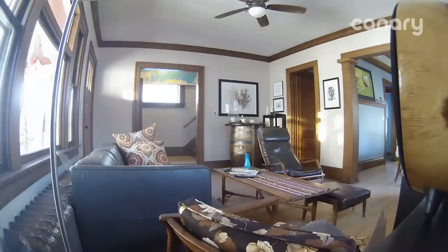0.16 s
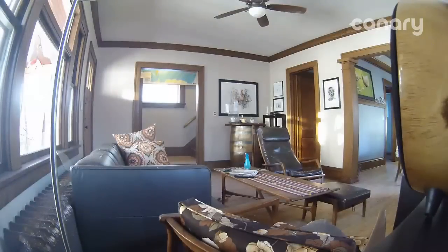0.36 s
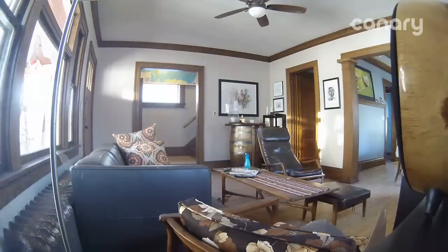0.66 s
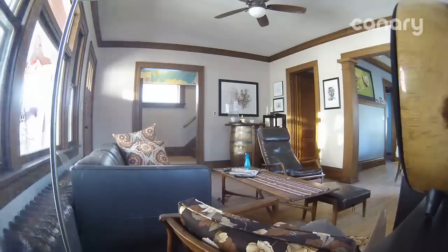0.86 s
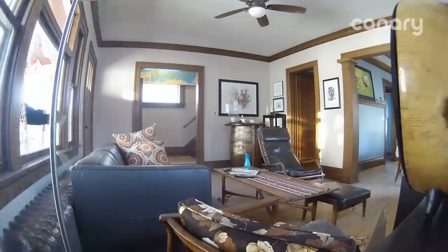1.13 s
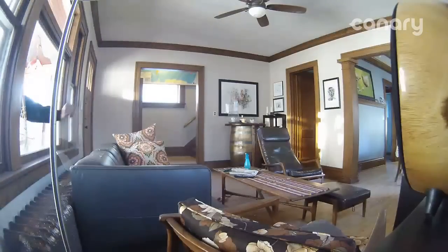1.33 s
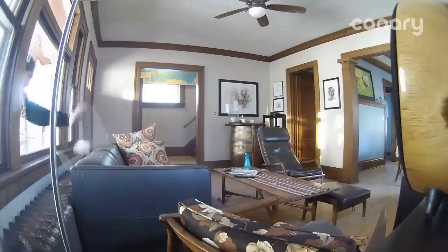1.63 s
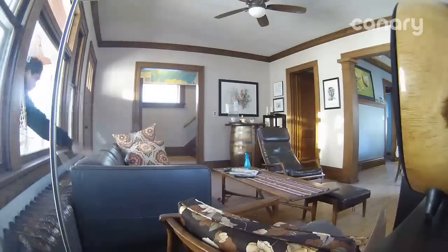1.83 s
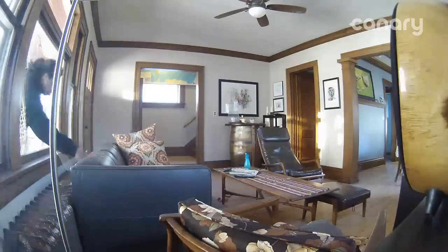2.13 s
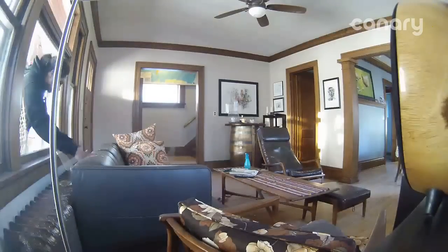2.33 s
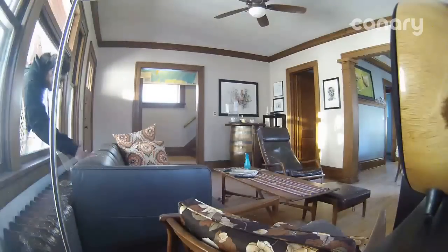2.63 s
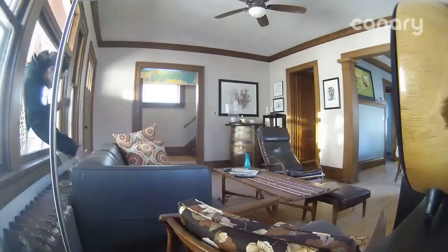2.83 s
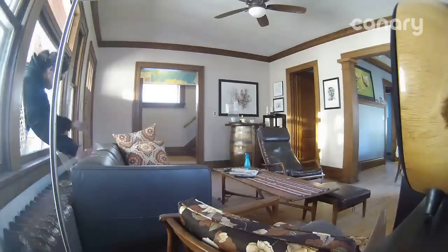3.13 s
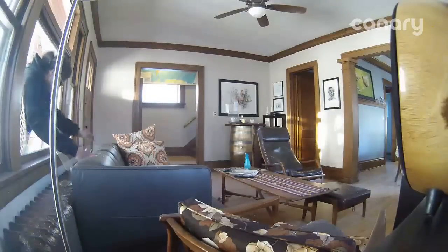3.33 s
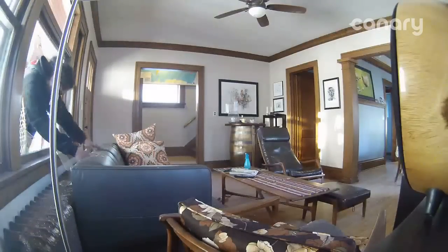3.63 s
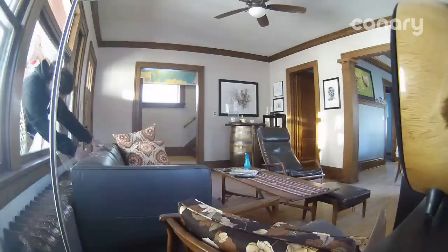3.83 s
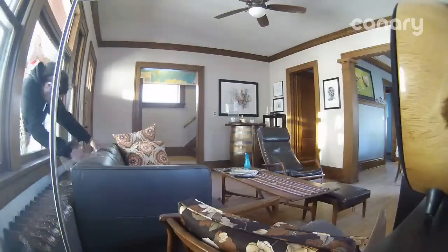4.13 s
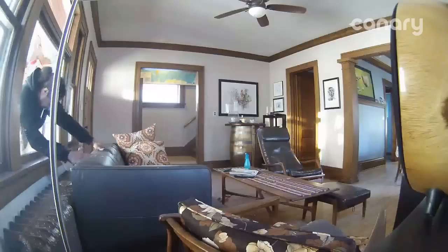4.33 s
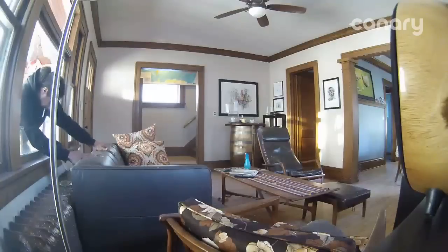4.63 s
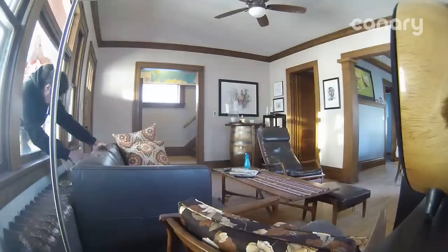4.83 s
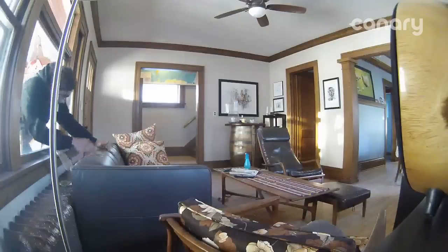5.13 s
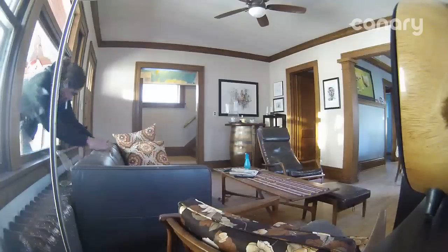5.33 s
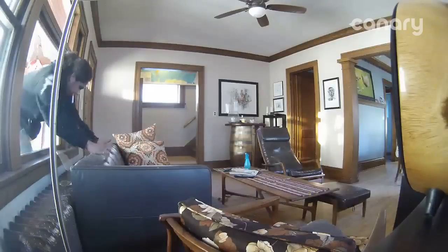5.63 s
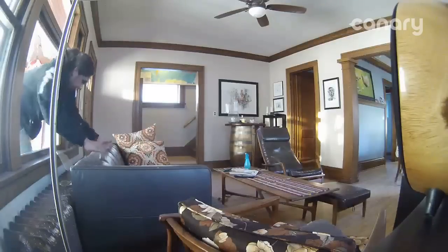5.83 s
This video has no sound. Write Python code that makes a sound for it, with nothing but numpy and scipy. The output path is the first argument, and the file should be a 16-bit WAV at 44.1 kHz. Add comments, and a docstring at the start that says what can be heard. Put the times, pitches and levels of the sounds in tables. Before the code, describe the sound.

In a quiet furnished living room, faint boom and hiss give way to a hard crack at about one second. After a short dropout, repeated blows break more glass; grit crunches and slides, splinters tinkle and big shards ring and clatter. Wooden frame knocks and soft thuds continue to the end. A small indoor microphone hisses and clips on the hardest hits.

```python
"""Glass grit slides and crunches as a window is broken into in a quiet living room, over frame boom and rumble.
Blows crack on pane and frame, soft thuds bump, splinters tinkle, four large shards ring as they knock about.
Grit, scrape, boom and rumble are patchy or plain shaped noise; cracks are noise bursts; knocks, thuds,
splinters and shards are damped sines. A decaying noise tail answers as the room. The small microphone
hisses, clips on the hardest blows and drops out twice."""
import sys
import numpy as np
from scipy import signal
from scipy.fft import rfft, irfft, next_fast_len
from scipy.io import wavfile
from scipy.ndimage import uniform_filter1d, map_coordinates

SR = 44100
rng = np.random.default_rng(int(sys.argv[2]) if len(sys.argv) > 2 else 0)


def persist_wave(psi):
    """Save psi, clipped to +-1, as 16-bit WAV."""
    counts = np.round(np.clip(psi, -1, 1) * 32767).astype(np.int16)
    wavfile.write(sys.argv[1], SR, np.atleast_2d(counts).T)


N = 263277


def amp(db):
    """dB to gain."""
    return 10 ** (np.asarray(db) / 20)


def unit(x):
    """Scaled to rms 1."""
    return x / np.sqrt(np.mean(x ** 2) + 1e-20)


def along(points, hz):
    """Value at hz from (Hz, value) points, linear over log frequency."""
    point_hz, value = np.transpose(points)
    return np.interp(np.log(hz + 1), np.log(point_hz + 1), value)


def filtered(x, response):
    """x with its spectrum multiplied by response(hz)."""
    m = next_fast_len(len(x) + 8192)
    return irfft(rfft(x, m) * response(np.fft.rfftfreq(m, 1 / SR)), m)[:len(x)]


def coloured(x, spectrum):
    """x shaped by a spectrum of (Hz, dB) points, at rms 1."""
    return unit(filtered(x, lambda hz: amp(along(spectrum, hz))))


def add(track, start_s, sound):
    """Mixes a sound into the track at start_s."""
    part = track[round(start_s * SR):][:len(sound)]
    part += sound[:len(part)]


def wobble(knots_per_s):
    """Random curve, straight between normally distributed knots."""
    knots = rng.standard_normal(int(N * knots_per_s / SR) + 4)
    return map_coordinates(knots, [np.arange(N) * knots_per_s / SR], order=1)


def patchy(depth_db, window=1024):
    """Noise whose gain varies at random in small time-frequency patches."""
    z = signal.stft(rng.standard_normal(N), nperseg=window)[2]
    field = uniform_filter1d(rng.standard_normal(z.shape), size=2, axis=0)
    field = uniform_filter1d(field, size=4, axis=1)
    return unit(signal.istft(z * amp(depth_db * unit(field)), nperseg=window)[1][:N])


def motion_levels():
    """Grit, scrape and frame in dB: each row ramps them from where they are to new peaks, then they fall."""
    # Each row: start in seconds, rise in seconds, then peak grit, scrape and frame level in dB.
    ramps = [(-.25, .35, -38.5, -44, -34.5), (.25, 0.11, -60, -63, -55.5), (.62, 0.15, -67, -74, -58.5),
             (.722, 0.0075, -54.5, -67, -63), (.765, 0.0069, -47, -64, -53.5),
             (.775, 0.055, -45.5, -53, -47), (0.899, 0.16, -31.5, -52.5, -58),
             (1.036, 0.014, -27.5, -37.5, -37), (1.07, 0.19, -34, -44, -41.5),
             (1.5, 0.06, -52.5, -57.5, -53), (1.59, 0.11, -53.5, -55, -47), (1.72, 0.08, -56, -61.5, -54),
             (1.87, 0.017, -47.5, -56.5, -49.5), (2.007, 0.017, -39.5, -49.5, -55),
             (2.14, 0.083, -59, -63.5, -50), (2.263, 0.0082, -30, -36.5, -37.5),
             (2.366, 0.017, -24, -46, -55.5), (2.44, 0.17, -36, -42.5, -55), (2.554, 0.0076, -29, -34, -41),
             (2.67, .095, -46, -53, -44.5), (2.766, 0.025, -19.5, -32.5, -47.5),
             (2.798, 0.11, -29, -40.5, -39), (2.978, 0.17, -35, -36.5, -36.5),
             (3.1, .09, -39.5, -45.5, -44.5), (3.288, 0.032, -33, -40, -37.5),
             (3.501, .085, -46.5, -46, -37), (3.588, .022, -50.5, -53.5, -65.5),
             (3.615, 0.24, -31, -51.5, -60.5), (3.792, 0.005, -27.5, -41, -51.5),
             (3.81, 0.12, -34.5, -42.5, -44), (3.972, 0.016, -27, -34, -40.5),
             (3.999, 0.066, -34, -38, -39), (4.298, 0.039, -42.5, -52.5, -48.5),
             (4.349, .07, -39, -45, -40), (4.43, .07, -34, -40.5, -37), (4.576, 0.011, -31, -37, -48.5),
             (4.599, 0.08, -29.5, -36, -40.5), (5.05, 0.08, -64.5, -72, -61.5),
             (5.36, 0.0077, -50, -49.5, -29), (5.38, 0.042, -58, -58, -41.5),
             (5.426, 0.017, -32, -40.5, -33), (5.46, 0.063, -37.5, -42.5, -41),
             (5.6, 0.0051, -34, -29, -36), (5.78, 0.063, -44.5, -41, -50), (5.848, .115, -47.5, -47, -35)]
    # Fall of grit, scrape and frame in dB per second.
    fall_db_per_s = [103, 94.5, 100.5]
    # Lowest level that the fall of grit, scrape and frame reaches in dB.
    floor_db = [-69, -73, -66.5]
    t = np.arange(0, N / SR, .001)
    fall = np.array(fall_db_per_s)[:, None]
    lowest = np.array(floor_db)[:, None]
    level = lowest + 0 * t
    for start_s, rise_s, *peak_db in ramps:
        since = t - start_s
        peak = np.array(peak_db)[:, None]
        before = level[:, [np.argmax(since >= 0)]]
        rising = before + (peak - before) * since / rise_s
        falling = peak - fall * (since - rise_s)
        after = np.where(since < rise_s, rising, falling)
        level = np.where(since >= 0, np.maximum(after, lowest), level)
    return [np.interp(np.arange(N) / SR, t, row) for row in level]


def motion():
    """Sliding glass: patchy hiss with splinters, and scrape, over the frame's boom, each on its level curve."""
    # Grit spectrum. Each row: frequency in Hz, relative level in dB.
    grit_spectrum = [(1350, -62.5), (2300, -4), (2750, -12.5), (3000, 0), (3380, -3.5), (3570, 1.5),
                     (4730, 3.5), (5080, -1.5), (6200, -11), (8590, -32.5), (8940, -34), (9590, -36.5),
                     (13200, -49), (15000, -89.5)]
    # Scrape spectrum. Each row: frequency in Hz, relative level in dB.
    scrape_spectrum = [(380, -39.5), (650, -8), (737, -6), (1200, 0), (1480, -7), (2230, -5), (2700, -7.5),
                       (3510, -34), (5940, -120)]
    # Wooden frame's spectrum. Each row: frequency in Hz, relative level in dB.
    frame_spectrum = [(120, -37.5), (200, -11), (265, -9.5), (404, -5), (456, -0.5), (529, -5), (668, -23),
                      (750, -18), (980, -46.5), (1650, -120)]
    grit_db, scrape_db, frame_db = motion_levels()
    splinter_db = -6  # over the hiss
    glass = patchy(4.1) + amp(splinter_db) * splinters(count=1300, cycles=600, spread_db=18.5)
    grit = amp(grit_db) * coloured(glass, grit_spectrum)
    scrape = amp(scrape_db) * coloured(patchy(3.74), scrape_spectrum)
    boom = amp(frame_db) * coloured(patchy(2.45), frame_spectrum)
    return grit + scrape + boom


def rumble():
    """Floor and sofa: low noise on a drawn level curve with a small random wander."""
    # Level curve before the wander. Each row: time in seconds, level in dB.
    rumble_level = [(0, -54.5), (.26, -66), (.53, -69), (.82, -59), (.98, -64), (1.04, -47), (1.599, -57.5),
                    (1.92, -58.5), (2.3, -53), (2.44, -62.5), (2.89, -50.5), (3.28, -61), (3.34, -50.5),
                    (3.58, -63.5), (3.68, -82.5), (3.95, -53.5), (4.75, -51.5), (5.26, -81), (5.37, -59),
                    (5.84, -54), (5.97, -46)]
    # Rumble spectrum. Each row: frequency in Hz, relative level in dB.
    bass_spectrum = [(12, -39.5), (20, -2.5), (92, 1.5), (145, 0), (230, -4), (300, -28), (510, -120)]
    wander_db = 2
    level_db = np.interp(np.arange(N) / SR, *np.transpose(rumble_level)) + wander_db * wobble(10)
    return amp(level_db) * coloured(rng.standard_normal(N), bass_spectrum)


def blows():
    """Each sharp blow is a decaying noise burst of cracking glass and a damped 450 Hz knock in the frame."""
    # Each row: start in seconds, crack level in dB before trim, frame knock level in dB, crack t60 in seconds.
    sharp_blows = [(0.7337, -41, -56, 0.047), (1.041, 4.5, -15, 0.02), (1.05, -25, -34, 0.045),
                   (1.641, -33, -62, 0.022), (1.8786, -42, -39, 0.018), (2.032, -28.5, -57, 0.038),
                   (2.2713, -16.5, -58, 0.051), (2.3801, -0.5, -39.5, 0.013), (2.3904, -19, -55.5, 0.04),
                   (2.5605, -10, -33.5, 0.023), (2.783, -17.5, -35, 0.073), (2.8395, 0, -16, 0.02),
                   (2.8613, -19, -25.5, 0.021), (3.2944, -29, -48.5, 0.011), (3.3176, -12.5, -36, 0.024),
                   (3.5933, 1, -46.5, 0.0098), (3.7974, -26, -36, 0.043), (3.9755, -18.5, -27, 0.025),
                   (4.4375, -21.5, -37, 0.055), (4.584, -24, -23.5, 0.06), (5.4277, -11, -13.5, 0.034),
                   (5.435, -15, -21, 0.028), (5.6073, -24, -24.5, 0.084)]
    # Cracking glass spectrum. Each row: frequency in Hz, relative level in dB.
    crack_spectrum = [(410, -44.5), (700, -12), (1300, -26.5), (2240, -8.5), (2760, -13), (4630, 10),
                      (5510, -8), (6550, -8), (7260, -24.5), (9250, -26.5), (11000, -40.5), (14300, -57),
                      (22000, -120)]
    trim_db, knock_hz, knock_t60_s = -4, 450, 0.049
    out, t = np.zeros(N), np.arange(SR // 6) / SR
    for start_s, crack_db, knock_db, t60_s in sharp_blows:
        burst = coloured(rng.standard_normal(len(t)), crack_spectrum)
        crack = burst * amp(crack_db + trim_db - 60 * t / t60_s) * (1 - np.exp(-t / .0004))
        knock = np.sin(2 * np.pi * knock_hz * t) * amp(knock_db - 60 * t / knock_t60_s)
        add(out, start_s, crack + knock * (1 - np.exp(-t / 0.0023)))
    return out


def room(x):
    """Room answer to x: a noise tail in which each frequency dies at its own speed."""
    # Each row: frequency in Hz, t60 in seconds.
    room_t60 = [(200, 0.49), (2000, 0.21), (8000, 0.13)]
    hz, t, z = signal.stft(rng.standard_normal(SR // 2), SR, nperseg=256)
    decay = amp(-60 * t / along(room_t60, hz)[:, None])
    tail = signal.istft(z * decay, SR, nperseg=256)[1]
    delayed = np.pad(x, (300, 0))  # samples
    return signal.fftconvolve(delayed, tail / np.linalg.norm(tail))[:N]


def thuds():
    """Soft bumps, each one damped sine with a gentle onset."""
    # Each row: start in seconds, level in dB, pitch in Hz, t60 in seconds.
    bumps = [(2.162, -29, 241, 0.059), (3.119, -22, 402, 0.044), (3.334, -20, 128, 0.053),
             (3.544, -12, 435, 0.028), (4.187, -26, 75.4, 0.12), (4.239, -21.5, 66.6, 0.041),
             (4.406, -24, 449, 0.046), (5.365, -25, 450, 0.13), (5.58, -13, 438, 0.038),
             (5.913, -28.5, 210, 0.15)]
    out, t = np.zeros(N), np.arange(SR // 6) / SR
    for start_s, db, hz, t60_s in bumps:
        add(out, start_s, amp(db - 60 * t / t60_s) * np.sin(2 * np.pi * hz * t) * (1 - np.exp(-t / 0.0059)))
    return out


def splinters(count, cycles, spread_db):
    """Small pieces of glass, each one damped sine of random pitch and size, falling by e in so many cycles."""
    # While broken pieces tumble about: start and end in seconds.
    loose_s = (2.36, 4.85)
    low_hz, high_hz = 6000, 14000
    draw, k = rng.random((count, 3)), np.arange(2048)
    hz = low_hz * (high_hz / low_hz) ** draw[:, 1:2]
    size = amp(-spread_db * draw[:, 2:])
    envelope = np.exp(-hz * k / SR / cycles) * np.sin(np.pi * (k / 2048) ** 0.48)
    ring = size * np.sin(2 * np.pi * hz * k / SR) * envelope
    start = ((loose_s[0] + draw[:, :1] * np.ptp(loose_s)) * SR).astype(int)
    at = start + k
    return unit(np.bincount(at.ravel(), ring.ravel(), N + 2048)[:N])


def shards():
    """A knock rings all modes of its shard, most those near the pitch that the contact favours."""
    # Each row: mode pitches in Hz; (relative level in dB, t60 in seconds) per mode;
    # knocks of (start in seconds, level in dB, favoured pitch in Hz, onset in seconds); rest time in seconds.
    large_shards = [ ([813, 1308, 2196, 2659, 2977, 3128, 3690, 4027, 4290, 4840, 4980, 5373, 6374, 7413, 7865],
                    [(-15, 0.86), (-22, 1), (-13.5, 1), (-22, 0.26), (-14.5, 0.59), (-11, 0.49),
                    (-12.5, .45), (1.5, 0.45), (-13, 0.14), (-8, 0.55), (-4.5, 0.6), (-7.5, .5),
                    (-5.5, 0.5), (-17, 0.18), (-9, 0.21)], [(2.378, -22.5, 4500, 0.0014),
                    (2.39, -21, 890, .005), (2.39, -22, 3000, 0.0034), (2.41, -26, 4330, 0.0055),
                    (2.47, -28.5, 5000, 0.012), (2.561, -28, 4300, 0.001)], 2.63),
                    ([2213, 3585, 4264, 4470, 4576, 4710, 5027, 6202], [(8.5, 0.34), (0, 0.38), (-14, 0.45),
                    (-2.5, 0.54), (-1, 0.45), (-1, 0.52), (-11, 0.27), (-11, 0.28)],
                    [(4.33, -41.5, 4600, 0.024), (4.437, -39.5, 4500, 0.0025), (4.59, -29, 4170, 0.011),
                    (4.65, -26.5, 3200, 0.027), (4.72, -27.5, 4230, 0.014)], 4.73),
                    ([2580, 3095, 3575, 3887, 4315, 4365, 4538, 5001, 6142, 6476, 6740, 7710, 8340, 9039, 9663, 10620, 11915, 12940],
                    [(-10.5, 0.89), (-4, 0.55), (-24, 0.46), (-22, 0.27), (2, 0.57), (-3.5, 0.97),
                    (-17, 0.57), (-22, 0.16), (-4.5, 0.4), (-35, 0.45), (-32.5, 0.14), (-19, 1),
                    (-10.5, 0.14), (-41, .2), (-51, 0.33), (-28.5, 0.59), (-26, 0.29), (-27, 0.23)],
                    [(2.840, -24, 7950, 0.004), (2.85, -26.5, 4420, 0.013), (2.98, -29, 4200, 0.0021),
                    (3.12, -32.5, 2530, 0.018), (3.06, -32.5, 8000, 0.02), (3.293, -26.5, 11100, 0.0019),
                    (3.317, -22.5, 4000, 0.0011), (3.325, -21, 2800, 0.0023), (3.36, -26, 5500, 0.0052)],
                    3.5),
                    ([894, 1075, 2015, 2290, 2482, 2541, 3117, 3208, 3634, 3780, 4242, 4312, 4570, 4813, 5865, 6121, 6710, 7095, 8285, 8651, 9530, 10350, 10730],
                    [(-7.5, 1), (-9.5, 0.2), (-15, 0.89), (-14, 0.57), (-11, 0.31), (-16, 0.31), (-12, 0.5),
                    (-4, 0.065), (-39, 0.16), (-5.5, 0.52), (-14, 0.44), (-12, 0.55), (-9.5, 0.46),
                    (2.5, 0.17), (-14, 0.12), (-22.5, 0.2), (-20.5, 0.49), (-14, 0.14), (-48, .3),
                    (-24, 0.17), (-22.5, 0.17), (-29.5, .2), (-37, 0.27)], [(3.592, -15.5, 5200, 0.0004),
                    (3.652, -22, 4040, 0.013), (3.70, -27.5, 2000, 0.027), (3.70, -31.5, 940, 0.026),
                    (3.745, -35, 9500, 0.0044), (3.735, -22.5, 3100, 0.0064), (3.80, -14.5, 3630, 0.021),
                    (3.82, -15, 1300, 0.02), (3.85, -16.5, 2200, 0.0033), (3.885, -38, 3350, 0.0029),
                    (3.90, -25, 1100, 0.0029), (3.976, -19.5, 2480, 0.0035), (4.0, -22, 3550, 0.0036),
                    (4.01, -40, 1010, .005), (4.045, -32, 3150, .005)], 4.29)]
    # Loss above and below the favoured pitch in dB per octave.
    favour_db_per_octave = (10, 15)
    above, below = favour_db_per_octave
    out, t = np.zeros(N), np.arange(SR // 2) / SR
    for pitches, modes, knocks, rest_s in large_shards:
        hz = np.array(pitches)[:, None]
        level_db, t60_s = np.transpose(modes)[:, :, None]
        for start_s, db, favoured_hz, onset_s in knocks:
            draw = rng.standard_normal((4, len(modes), 1))
            scatter_db = 1.5 * draw[0]
            octaves = np.log2(hz / favoured_hz)
            away_db = np.maximum(above * octaves, -below * octaves)
            damped_db = 300 * np.maximum(start_s + t - rest_s, 0)  # lying flat, it stops ringing
            ring_db = db + level_db + scatter_db - away_db - damped_db - 60 * t / t60_s
            gain = amp(ring_db) * (1 - 2 * t)  # linear fade to nothing at 0.5 s
            # close mode pairs of an uneven plate
            beat = 1 + .4 * np.sin(2 * np.pi * hz / 300 * draw[2] * t + draw[3])
            ring = (gain * beat * np.sin(2 * np.pi * hz * t + draw[1])).sum(0)
            add(out, start_s, ring * (1 - np.exp(-t / abs(onset_s))))
    return out


def scene():
    """All sources, with the room answering blows, thuds and shards."""
    hits = blows() + thuds()
    rings = shards()
    echo = room(amp(-12.5) * hits + amp(-11.5) * rings)
    return (motion() + rumble() + hits + rings + echo)[None]


def record(dry):
    """The microphone hisses, the input clips, the stream falls silent twice, the top is band-limited."""
    # Microphone's own noise spectrum. Each row: frequency in Hz, relative level in dB.
    hiss_spectrum = [(700, -1), (3000, -3.5), (13000, -13), (15500, -14)]
    # Each row: start in seconds, end in seconds.
    dropouts = [(1.4255, 1.5813), (5.7215, 5.8345)]
    hiss_db, clip, rolloff_hz, top_hz = -74.0, .39, 14800, 16000
    x = dry[0] + amp(hiss_db) * coloured(rng.standard_normal(N), hiss_spectrum)
    x = x / (1 + np.abs(x / clip) ** 12) ** (1 / 12)
    for start_s, end_s in dropouts:
        x[round(start_s * SR):round(end_s * SR)] = 0
    return filtered(x, lambda hz: (1 + (hz / rolloff_hz) ** 40) ** -.5 * (hz < top_hz))[None]


dry = scene()
out = record(dry)
persist_wave(out)
```